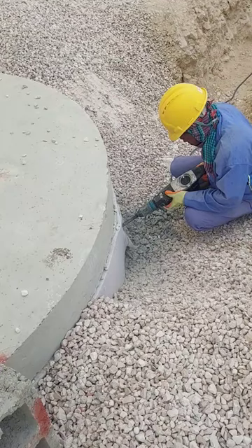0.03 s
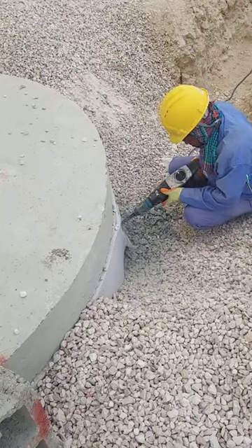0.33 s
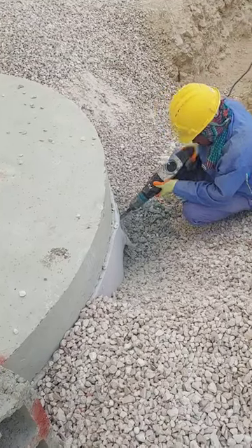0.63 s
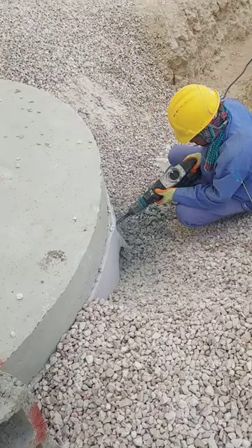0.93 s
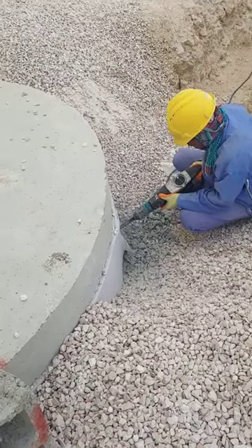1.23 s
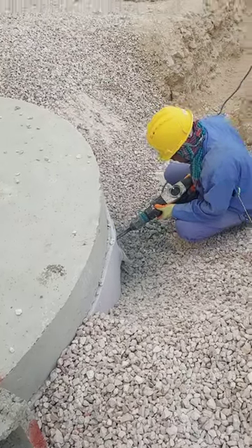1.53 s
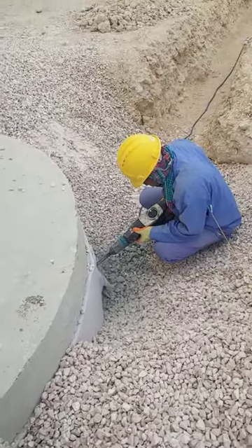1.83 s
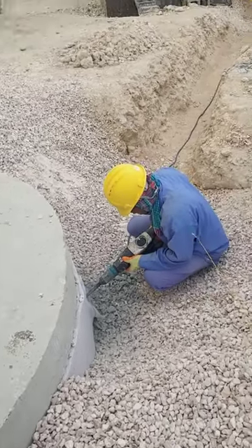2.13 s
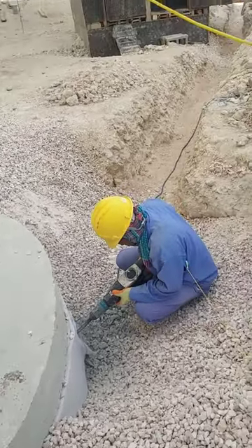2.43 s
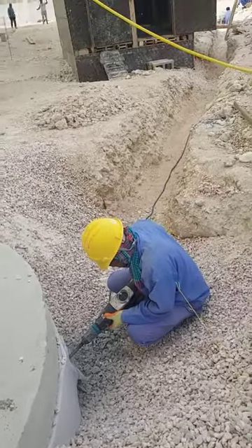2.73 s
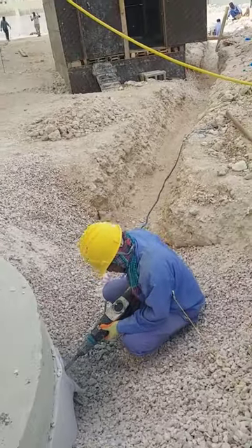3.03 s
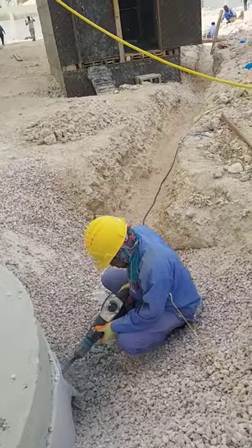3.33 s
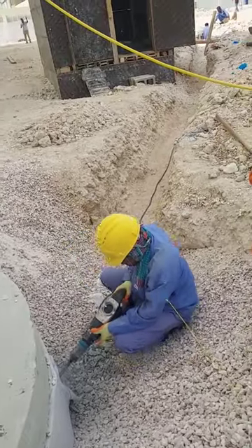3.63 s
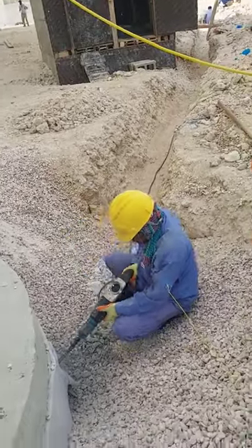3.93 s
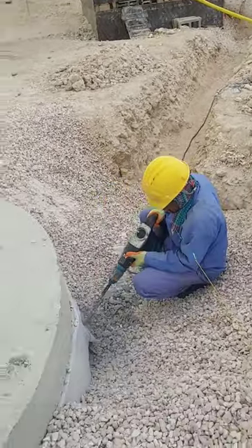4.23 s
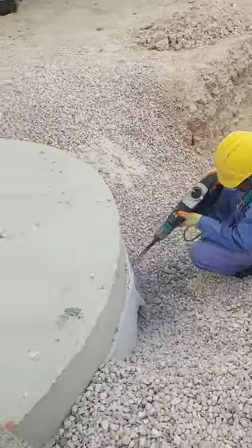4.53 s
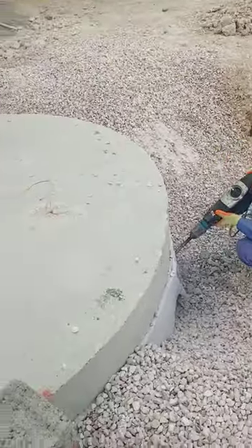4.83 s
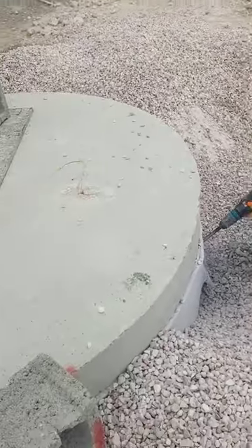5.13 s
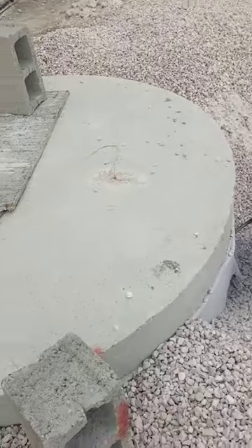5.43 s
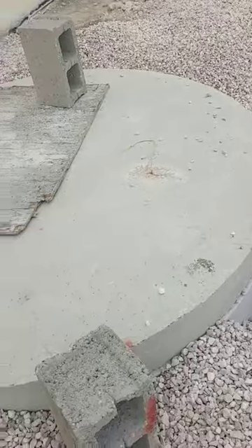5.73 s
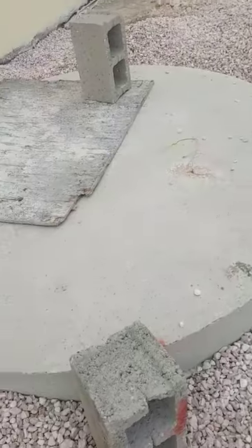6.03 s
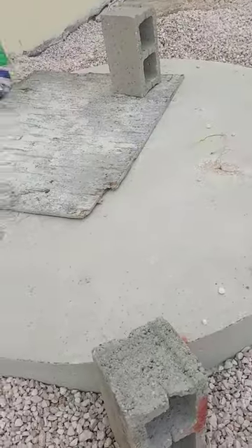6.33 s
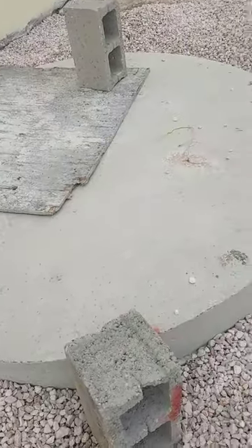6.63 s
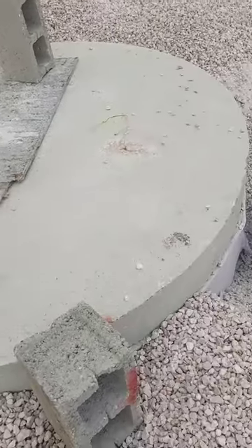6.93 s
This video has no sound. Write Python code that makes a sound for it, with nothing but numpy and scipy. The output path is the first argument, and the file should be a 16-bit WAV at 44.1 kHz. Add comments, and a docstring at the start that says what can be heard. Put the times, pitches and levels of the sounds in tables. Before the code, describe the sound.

On an open building site, a nearby electric hammer chisels concrete with a dense, buzzing stream of blows and a bright metallic ring. It briefly dulls when the tip jams and jangles when it slips. After about four seconds the tool runs free with only fan hiss and gear whir, then bites again and hammers to the end. Low gusts and soft thumps of wind hit the microphone, mainly from the left.

```python
"""Demolition hammer on concrete

An electric hammer chisels outdoors at about 47 blows a second, runs free for a moment, then bites again.
Each turn of its crank rattles the striker, pings the anvil, drives the ringing steel chisel into the
stone and knocks the housing. The motor fan hisses throughout, and wind buffets the microphone,
mostly on the left."""
import sys
import numpy as np
from scipy import signal
from scipy.fft import rfft, irfft, next_fast_len
from scipy.io import wavfile
from scipy.ndimage import uniform_filter1d, map_coordinates

SR = 44100
rng = np.random.default_rng(int(sys.argv[2]) if len(sys.argv) > 2 else 0)


def file_out(sig):
    """Save sig as 16-bit WAV at sys.argv[1]."""
    # one column per channel
    cols = np.atleast_2d(sig).T
    # limit, then scale
    lim = np.clip(cols, -1, 1)
    pcm = np.round(lim * 32767).astype(np.int16)
    wavfile.write(sys.argv[1], SR, pcm)


N = 317079
T = np.arange(N) / SR
HZ = np.fft.rfftfreq(next_fast_len(N, True), 1 / SR)


def amp(db):
    """Turns decibels into a gain."""
    return 10 ** (np.asarray(db) / 20)


def unit(x):
    """Scales a sound to an average (rms) size of 1."""
    return x / np.sqrt(np.mean(x ** 2) + 1e-20)


def curve(rows):
    """Joins a time table's points with straight lines, one curve per column."""
    times, *columns = np.transpose(rows)
    return [np.interp(T, times, column) for column in columns]


def swells(rows):
    """Adds up bell-shaped rises, one per row of t/s, half length/s, height."""
    t = T[::64]
    return np.interp(T, t, sum(height * np.exp(-((t - s) / half) ** 2) for s, half, height in rows))


def waver(samples):
    """A random wobble, smoothed over this many samples."""
    return unit(uniform_filter1d(uniform_filter1d(rng.standard_normal(N), samples), samples))


def noise(alike, size=N):
    """Left and right white noise; alike (0-1) is the share they have in common."""
    shared, *own = rng.standard_normal((3, size))
    return np.sqrt(alike) * shared + np.sqrt(1 - alike) * np.array(own)


def spectrum(x):
    """The sound's strength and phase at each frequency in HZ."""
    return rfft(x, 2 * len(HZ) - 2)


def colour(x, points):
    """Shapes the tone by rows of f/Hz, level/dB."""
    hz, db = np.transpose(points)
    return irfft(spectrum(x) * amp(np.interp(np.log(HZ + 1), np.log(hz), db)))[..., :N]


def regrip():
    """The worker shifts grip while the tool runs free: 0 before, 1 after."""
    return np.clip((T - 4.1) / .5, 0, 1)


def by_grip(first, second):
    """Fades from the first grip's sound to the second's."""
    share = regrip()
    return (1 - share) * unit(first) + share * unit(second)


def ring(x, modes):
    """Makes a part ring at its own notes, whose strengths depend on the grip."""
    drive, first, second = spectrum(x), 0, 0
    for hz, width, first_db, second_db in modes:
        mode = 1j * HZ * width / (hz ** 2 - HZ ** 2 + 1j * HZ * width)
        first += amp(first_db) * mode
        second += amp(second_db) * mode
    return by_grip(irfft(drive * first)[:, :N], irfft(drive * second)[:, :N])


def blows(turns, delay, decay_s, spread_db, scatter):
    """One dying pulse per crank turn, varying in size and timing (delay and scatter are in turns)."""
    beats = np.arange(np.ceil(turns[-1]))
    size, late = rng.standard_normal((len(beats), 2)).T
    at = np.interp(beats + delay + scatter * late, turns, np.arange(N)).astype(int)
    kicks = np.bincount(at, amp(spread_db * np.clip(size, -2, 2)), N)
    return signal.lfilter([1], [1, -np.exp(-1 / (decay_s * SR))], kicks)


def repeat(turns, harmonics):
    """Builds one turn's wave from its harmonics and plays it on every turn."""
    waves = irfft(harmonics)
    angle = np.arange(waves.shape[1]) / waves.shape[1]
    return np.array([np.interp(turns % 1, angle, wave, period=1) for wave in waves])


def clatter(turns, top, centre, width, alike, size=4096):
    """The same clatter each turn, bunched around centre; harmonics from 18 to below top are equal."""
    distance = abs((np.arange(size) / size - centre + .5) % 1 - .5)
    burst = np.exp(-distance / width) * noise(alike, size)
    harmonics = np.zeros((2, size // 2 + 1), complex)
    harmonics[:, 18:top] = np.exp(1j * np.angle(rfft(burst)[:, 18:top]))
    return unit(repeat(turns, harmonics))


# the tip sinks in and jams: t/s, half length/s, depth/0-1
JAMS = [(.66, 0.055, 0.46), (1.31, 0.048, 0.07), (3.37, 0.19, 0.36), (3.74, 0.064, 0.8)]
# the stone gives way and the chisel slips: t/s, half length/s, strength/0-1
SLIPS = [(.53, 0.068, 0.36), (.81, 0.074, 0.67), (3.88, 0.097, 0.45), (4.98, 0.085, 0.86),
         (5.15, 0.084, 0.49), (6.02, .1, 0.15)]
def react(jam_db, slip_db):
    """How a part gets louder or softer as the tip jams or slips."""
    return amp(jam_db * swells(JAMS) + slip_db * swells(SLIPS))


# how hard the worker leans on the tool: t/s, level/dB
PUSH = [(0.14, -0.5), (0.4, -2), (0.6, -3), (0.95, -3.5), (1.5, -2), (2.5, 0), (3.25, 0.5), (3.55, 1.5),
        (3.9, -0.5), (4.0, -7), (4.85, -4.5), (5.25, 1), (5.85, -0.5), (6.3, -2), (6.55, -1), (7.19, -0.5)]
def lean(first_db, second_db, per_push):
    """A part's gain in each grip, plus per_push dB for each dB of push."""
    grip_db = first_db + (second_db - first_db) * regrip()
    return amp(grip_db + per_push * curve(PUSH)[0])


# tone of the motor's cooling air: f/Hz, level/dB
FAN_TONE = [(100, 1), (300, 3.5), (600, -2.5), (950, 0.5), (1160, 0), (1400, -1), (1720, 5), (2100, -3),
            (2700, 0.5), (4200, -5.5), (5300, -6), (8300, -19.5), (10000, -12.5), (15500, -15)]
# gearbox notes: f/Hz, width/Hz, first grip/dB, second grip/dB
GEAR_NOTES = [(1136, 94, 4.5, 5), (1720, 165, -3, 5.5), (2870, 94, -4, -2.5), (3360, 140, 0, -5),
              (5280, 1050, -4, -17)]
def fan_and_gears(turns):
    """Air hisses and gears rattle, throbbing with the crank."""
    throb = amp(0.5 * np.cos(2 * np.pi * turns))
    teeth = unit(noise(0.3) * blows(turns, delay=0, decay_s=0.016, spread_db=1, scatter=.12))
    hiss = unit(colour(noise(0.55) * throb, FAN_TONE))
    return amp(-33.5) * hiss + amp(-36.5) * ring(teeth, GEAR_NOTES)


# notes of the striker and tool holder: f/Hz, width/Hz, first grip/dB, second grip/dB
STRIKER_NOTES = [(1124, 65, 4, 1), (1350, 80, -3, -18), (1707, 50, 4, 22), (1894, 240, -0.5, -25),
                 (2380, 480, -6, -32), (3190, 190, -8, -5)]
def striker(turns):
    """Piston and striker rattle in the barrel, ever louder in the second grip."""
    first = clatter(turns, top=70, centre=0.068, width=0.19, alike=0.34)
    second = clatter(turns, top=70, centre=-0.13, width=0.062, alike=0.54)
    loose = unit(noise(.5) * blows(turns, delay=-.18, decay_s=.016, spread_db=1.5, scatter=.01))
    growth = amp(5.5 * (T - 6) * regrip())  # 5.5 dB a second
    return growth * ring(by_grip(first, second) + amp(-1.5) * loose, STRIKER_NOTES)


# notes of the anvil, between striker and chisel: f/Hz, width/Hz, first grip/dB, second grip/dB
ANVIL_NOTES = [(3472, 74, 12.5, -15), (3524, 21, -26, -3), (5020, 135, 3, -11.5)]
def anvil(turns):
    """The striker pings the anvil just before each blow, softer the later the left side hears it."""
    steady = clatter(turns, top=120, centre=-.17, width=.05, alike=.5)
    loose = unit(noise(0.57) * blows(turns, delay=-.23, decay_s=0.0053, spread_db=0, scatter=0.028))
    ping_trim_db = -0.46 * curve(DIRECTION)[0]
    return amp(ping_trim_db) * unit(ring(steady + amp(3) * loose, ANVIL_NOTES))


# notes of the steel chisel: f/Hz, width/Hz, first grip/dB, second grip/dB
CHISEL_NOTES = [(5230, 530, -9.5, -9), (7048, 80, 4, 2), (9530, 145, -6, -8.5), (10000, 39, -5, -6),
                (12190, 160, -3, -1), (14150, 66, 4, 6), (15300, 210, -0.5, -4.5)]
# tone of steel scraping stone: f/Hz, level/dB
SCRAPE_TONE = [(3000, -9), (6500, -27), (9000, -18), (10800, -2), (11500, 5.5), (12500, 13), (13300, 18),
               (14500, 11), (15500, 2)]
# how firmly the tip presses on the concrete: t/s, force/0-1
BITE = [(0, 0.4), (.7, .9), (.9, 0.45), (3.9, 0.15), (5.8, 0.16), (6, 0), (7.2, 0)]
def chisel(turns):
    """The steel rings and scrapes at each blow and bounce, until the pressed tip chokes it."""
    hit = blows(turns, delay=0.0027, decay_s=0.0036, spread_db=0.5, scatter=.008)
    bounce = blows(turns, delay=.15, decay_s=0.0066, spread_db=2, scatter=0.041)
    contact = np.hypot(hit, amp(4.5) * bounce)
    ringing = unit(ring(noise(0.22) * contact, CHISEL_NOTES))
    scrape = amp(-4) * unit(colour(noise(0.091) * contact, SCRAPE_TONE))
    force = curve(BITE)[0]
    choke = amp(force * np.interp(turns % 1, [0, .02, .35, .6, .97, 1], [-5, 0, 0, -7, -7, -5]))
    # a loose chisel never stops ringing
    jangle = amp(-6.5 + 4.7 * swells(SLIPS)) * (1 - force) * unit(ring(noise(0.1), CHISEL_NOTES))
    return unit(unit(ringing + scrape) * choke + jangle)


# tone of crumbling concrete: f/Hz, level/dB
CRUNCH_TONE = [(300, -10.5), (1000, 2.5), (2500, -5), (3600, -2), (4200, -10.5), (5100, -1), (6600, 0),
               (8000, -4), (9500, -6.5), (11000, -4), (12500, -9), (15500, -30)]
def stone(turns):
    """The tip cracks the concrete, and grit crumbles after it."""
    crack = clatter(turns, top=170, centre=.03, width=.025, alike=.4)
    crack *= unit(blows(turns, delay=-0.0045, decay_s=0.0067, spread_db=5, scatter=0.0033))
    crumble = blows(turns, delay=0.0042, decay_s=0.015, spread_db=3, scatter=0.011)
    grit = unit(noise(0.42) * amp(waver(samples=24)) * crumble)
    return unit(colour(amp(-7) * unit(crack) + grit, CRUNCH_TONE))


def recoil(turns, levels, delay, phase_scatter, size=4096):
    """One kick of the casing, repeated each turn: a sharp push that rings off."""
    k, db = np.transpose(levels)
    k = np.round(k).astype(int)
    log_gain = np.log(amp(np.interp(abs(np.fft.fftfreq(size, 1 / size)), k, db, right=-30)))
    phase = -signal.hilbert(log_gain).imag[k]  # puts the ringing after the push
    blur = phase_scatter * np.sqrt(k / k[-1]) * noise(0.87, len(k))
    harmonics = np.zeros((2, size // 2 + 1), complex)
    harmonics[:, k] = amp(db) * np.exp(1j * (phase + blur))
    return repeat(turns - delay, harmonics)


# the housing's buzz in each grip: multiple of the blow rate, level/dB
FIRST_BUZZ = [(1, -15), (2, -16.5), (3, -9), (4, -4), (5, 1), (6, -14), (7, -4.5), (8, -14), (9, -9),
              (10, -14), (11, -6.5), (12, -11), (13, -5), (14, -14.5), (15, -9), (16, -4.5), (17, -8),
              (18, -21.5), (19, -5), (20, -72), (21, -43.5), (22, -10.5), (23, -4), (24, -4), (25, -28.5),
              (26, -53), (27, -22), (28, -6), (29, -11.5), (30, -32), (31, -28), (32, -32)]
SECOND_BUZZ = [(1, -32), (2, -8.5), (3, -9.5), (4, -2), (5, 3.5), (6, -6), (7, -2.5), (8, -12), (9, -9.5),
               (10, -11.5), (11, -11), (12, -9.5), (13, -6.5), (14, -25), (15, -14.5), (16, -8.5), (17, -8),
               (18, -4.5), (19, -5), (20, -8), (21, -23), (22, -8), (23, -20), (24, -19), (25, -15),
               (26, -11), (27, -13), (28, -12)]
def housing(turns):
    """Each blow shakes the casing in nearly the same way; its high clank dies between blows."""
    uneven = turns + 0.0024 * waver(samples=700)
    first = recoil(uneven, FIRST_BUZZ, delay=0.0403, phase_scatter=1.8)
    second = recoil(uneven, SECOND_BUZZ, delay=0.045, phase_scatter=0.88)
    knock = by_grip(first, second)
    thud = colour(knock, [(700, 0), (1000, -30)])
    clank = (knock - thud) * amp(3.9 * np.cos(2 * np.pi * (turns - .14)) - 4)
    return (thud + clank) * amp(.5 * waver(samples=900))


# tone of wind on the microphone: f/Hz, level/dB
RUMBLE_TONE = [(22, -52), (36, -32), (50, 0.5), (80, -0.5), (120, 0), (180, -4.5), (260, -6.5),
               (400, -18.5), (900, -40), (3000, -88)]
# gusts: t/s, half length/s, level/dB
GUSTS = [(.14, 0.016, -26), (0.333, 0.06, -30), (0.71, 0.18, -25.5), (1.106, 0.22, -29),
         (2.082, 0.032, -21), (2.3, 0.064, -39), (2.658, .05, -34), (2.925, .04, -26.5), (3.717, 0.13, -22),
         (4.005, 0.024, -19), (4.183, 0.018, -24), (4.395, 0.051, -20), (4.596, 0.085, -18),
         (4.842, 0.1, -22.5), (5.057, 0.084, -19), (5.273, 0.11, -23), (5.952, .035, -26),
         (6.349, 0.016, -13), (6.505, 0.08, -14.5), (6.73, 0.11, -22.5), (7.086, 0.036, -20),
         (7.18, .03, -27)]
# single thumps of air: t/s, level/dB, f/Hz, decay/s
BUFFETS = [(0.121, -9, 130, 0.0029), (.772, -17, 118, 0.006), (3.988, -14, 430, 0.0035),
           (4.004, -6, 467, 0.00039), (4.327, -8.5, 132, 0.0031), (4.343, -7, 120, 0.004),
           (4.396, -17, 660, 0.0011), (4.401, 0.5, 130, 0.0063), (4.402, -1.5, 266, 0.0031),
           (4.554, -14, 194, 0.0021), (4.607, -10, 131, 0.0072), (6.342, -10, 120, 0.0084),
           (6.347, -10, 260, 0.0017), (6.491, -11, 89, 0.0091)]
def wind():
    """A light breeze with gusts and thumps hits the microphone, mostly on the left."""
    breeze = amp(-37.5 + 5 * waver(samples=4000))
    gusts = swells([(s, half, amp(db)) for s, half, db in GUSTS])
    left_db = 20 * np.log10(np.hypot(breeze, gusts))
    air = unit(colour(noise(0.205), RUMBLE_TONE)) * amp(0.53 * waver(samples=1100))
    air *= amp([left_db, 0.36 * left_db - 28.5])
    age = np.arange(SR // 8) / SR
    for s, db, hz, decay_s in BUFFETS:
        at = round(s * SR)
        envelope = amp(db) * age / decay_s * np.exp(1 - age / decay_s)
        air[:, at:at + len(age)] += np.outer([1, .08], envelope * np.sin(2 * np.pi * hz * age))
    return air


# tone of the jammed tip's dry snap: f/Hz, level/dB
SNAP_TONE = [(800, -11), (1700, -6), (4200, -4), (6300, 6), (8000, -21), (12000, -14), (15500, -14)]
def snap(turns):
    """A jammed tip meets solid stone with one very short snap per blow."""
    burst = blows(turns, delay=.025, decay_s=.0015, spread_db=1, scatter=.002)
    jammed = np.clip(swells(JAMS), 0, .6)
    return amp(-25) * jammed * unit(colour(noise(0.31) * burst, SNAP_TONE))


# how much louder the left side is: f/Hz, left minus right/dB
BALANCE = [(100, 1.5), (380, 0.5), (700, -4), (1300, -4), (1750, -4), (2400, -0.5), (4400, -1.5),
           (8000, -1), (15000, -0.5)]
# the tool's direction, as how late the left side hears it: t/s, delay/samples
DIRECTION = [(0, 3.5), (1, -0.5), (1.7, 2.5), (2.3, 4), (2.8, 6), (3.8, 6.5), (4.6, -1.5), (6.5, 0),
             (7.2, -4.5)]
def microphone(tool):
    """The two sides hear the tool with their own tone and a tiny delay between them."""
    left = colour(tool[0], [(hz, db / 2) for hz, db in BALANCE])
    right = colour(tool[1], [(hz, -db / 2) for hz, db in BALANCE])
    delayed_left = map_coordinates(left, [np.arange(N) - curve(DIRECTION)[0]], order=5)
    return np.array([delayed_left, right])


# how far the blows fall behind a steady beat as the load changes: t/s, lag/turns
CRANK_LAG = [(0, .55), (1.3, .55), (2.3, .52), (3.35, .51), (3.42, .53), (3.5, .52), (3.69, .62),
             (3.82, .44), (3.94, .66), (4.8, 1.16), (4.9, 1.33), (5.4, 1.34), (5.85, 1.36), (6.25, 1.33),
             (7.2, 1.3)]
# how loudly the steel rings: t/s, anvil level/dB, chisel level/dB
STEEL_LEVELS = [(0.14, -42, -25.5), (.55, -41, -25), (.75, -37, -28.5), (1.03, -35.5, -24),
                (1.2, -37, -29.5), (1.6, -34, -27), (2.5, -29.5, -28), (3.1, -34, -26.5),
                (3.42, -26.5, -25.5), (3.65, -33.5, -32), (3.9, -37, -29), (4.85, -36, -29.5),
                (5.1, -36, -26), (5.6, -38, -22.5), (6.4, -34.5, -24), (7.19, -38, -26.5)]
# the striker only hits while the tool is pushed in: t/s, strength/0-1
STRIKING = [(0, 0.91), (3.94, 1), (4.03, 0), (4.78, 0.15), (4.85, 0.98), (7.2, 0.9)]
def scene():
    """One crank drives every part of the tool; the open site gives no echo."""
    blow_hz = 47.12
    turns = blow_hz * T - curve(CRANK_LAG)[0]
    knock = housing(turns) * lean(-22.5, -27.5, per_push=1) * react(jam_db=-6.5, slip_db=-3.5)
    rattle = striker(turns) * lean(-31.5, -30.5, per_push=2) * react(jam_db=-5, slip_db=-1)
    crunch = stone(turns) * lean(-29, -29.5, per_push=0.64) * react(jam_db=-6, slip_db=2)
    anvil_gain, chisel_gain = amp(curve(STEEL_LEVELS))
    ping = anvil(turns) * anvil_gain * react(jam_db=-4, slip_db=0.85)
    ringing = chisel(turns) * chisel_gain * react(jam_db=-19, slip_db=10)
    # a jammed tool falls quiet between blows, which peak 0.079 of the way through a turn
    damping = amp(2.5 * swells(JAMS) * np.cos(2 * np.pi * (turns - 0.079)))
    hammering = damping * (knock + rattle + crunch) + ping + ringing + snap(turns)
    return microphone(curve(STRIKING)[0] * hammering + fan_and_gears(turns)) + wind()


def record(dry):
    """The sound cuts in, a limiter turns down the loudest peaks, and the highest treble is removed."""
    start_s, ceiling_db, cutoff_hz = .1165, -3.5, 15650
    live = dry * np.clip((T - start_s) / .002, 0, 1)
    peak_db = 20 * np.log10(abs(live).max(0) + 1e-9)
    recovery = 90 * T  # the level comes back at 90 dB a second
    held_db = np.maximum.accumulate(peak_db + recovery) - recovery
    over_db = np.maximum(held_db - ceiling_db, 0)
    limited = live * amp(-uniform_filter1d(over_db, 64))
    lowpass = signal.firwin(255, cutoff_hz, window=("kaiser", 9), fs=SR)
    return signal.oaconvolve(limited, lowpass[None], "same")


dry = scene()
out = record(dry)
file_out(out)
```